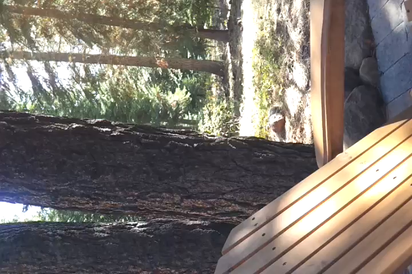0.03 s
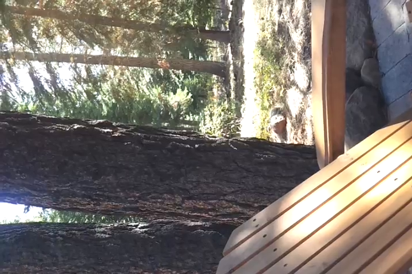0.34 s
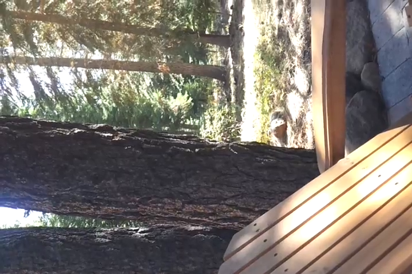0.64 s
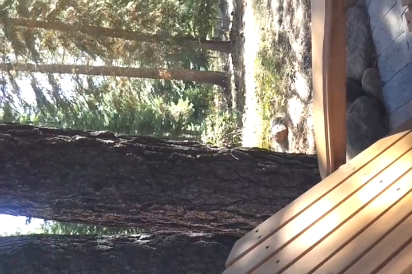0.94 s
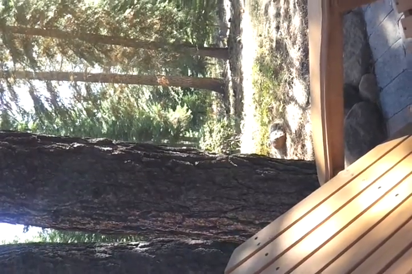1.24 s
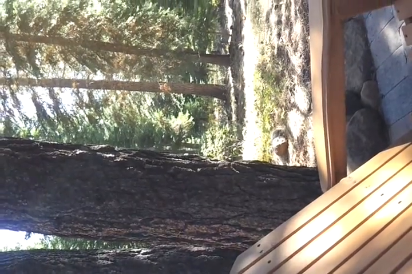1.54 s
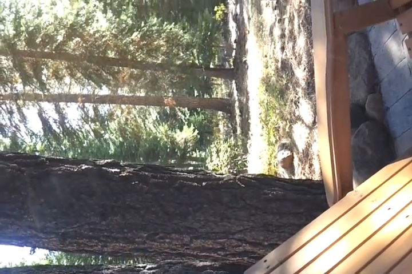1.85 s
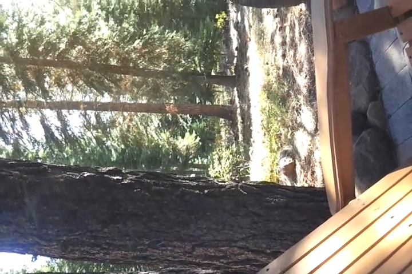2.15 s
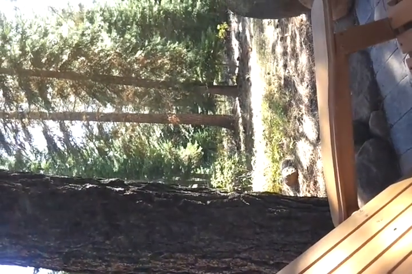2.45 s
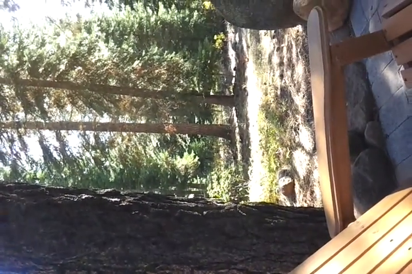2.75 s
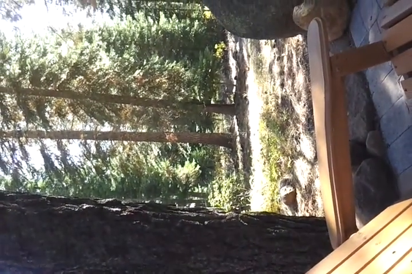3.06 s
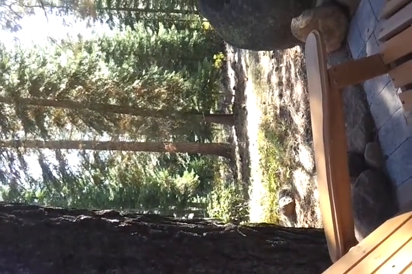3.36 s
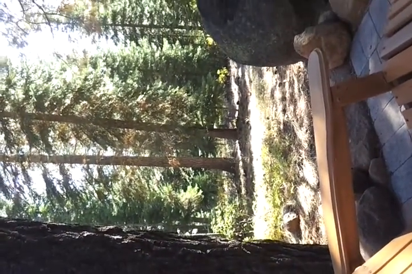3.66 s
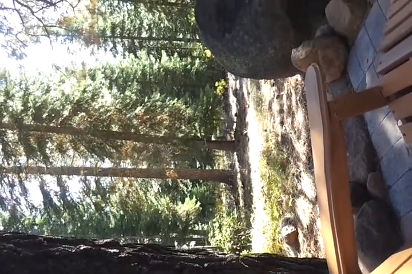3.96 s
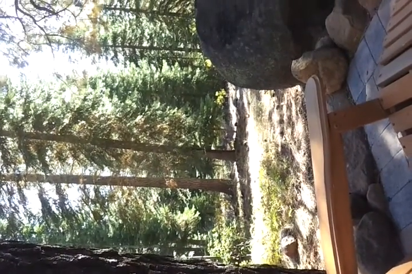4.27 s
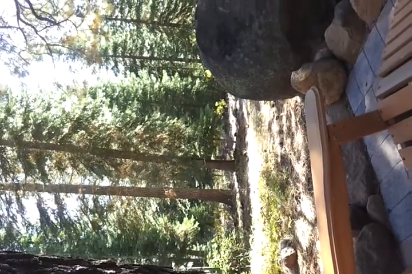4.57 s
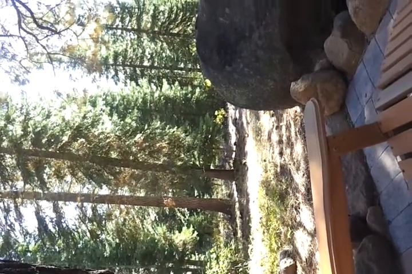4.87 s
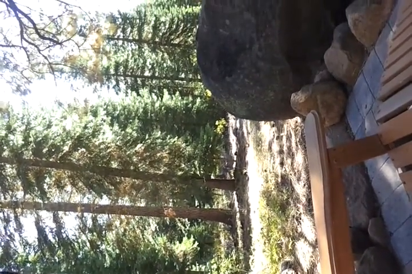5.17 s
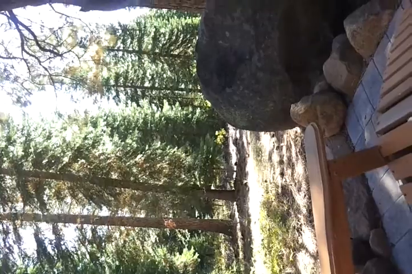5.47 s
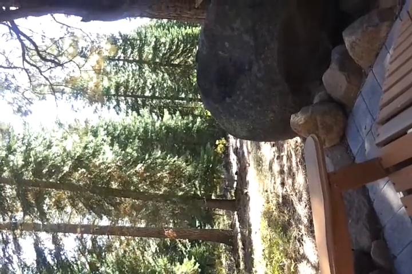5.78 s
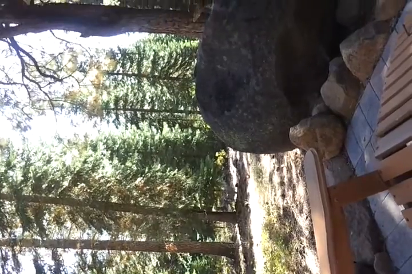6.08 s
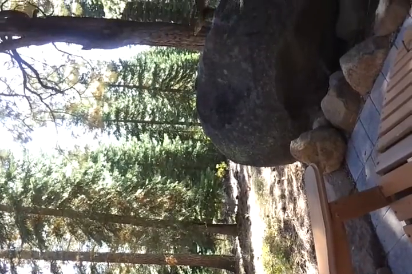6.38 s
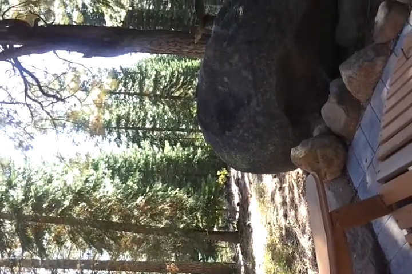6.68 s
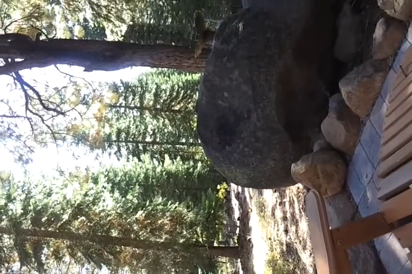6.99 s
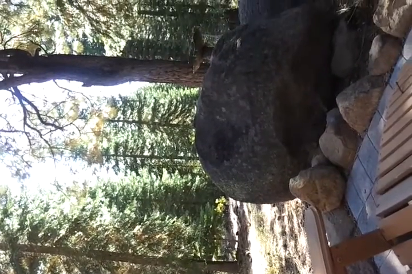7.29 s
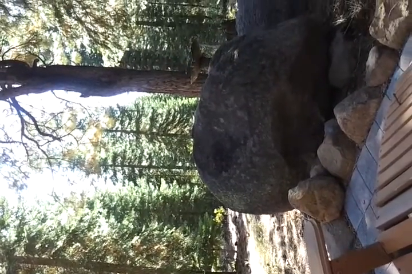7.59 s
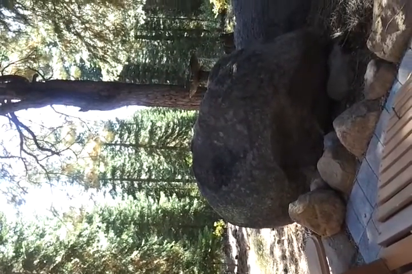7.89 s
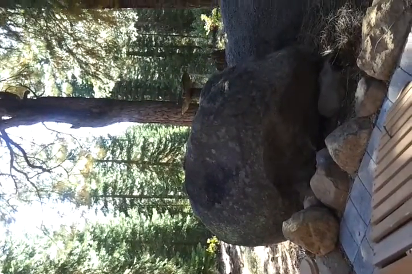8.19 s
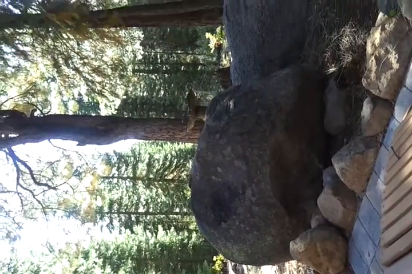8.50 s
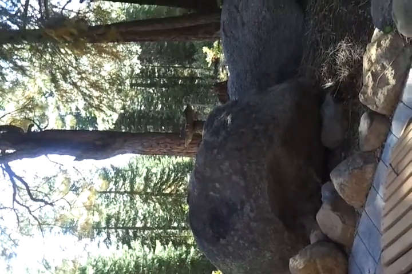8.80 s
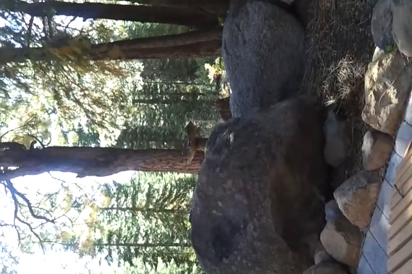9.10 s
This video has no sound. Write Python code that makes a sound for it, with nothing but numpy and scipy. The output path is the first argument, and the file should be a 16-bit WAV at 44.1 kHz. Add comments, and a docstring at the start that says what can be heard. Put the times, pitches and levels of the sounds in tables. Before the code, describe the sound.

A quiet, steady rush of wind in forest trees grows slightly, while light puffs of air bump the microphone.

```python
"""After a short silence, a steady rush of wind in tall conifers fades in and slowly picks up.
The far forest roars; nearer crowns join with a brighter rush and a faint howl, and needles hiss.
Puffs of air reach a cabin deck and rumble on the microphone, where eddies land as soft low thuds.
A few faint high peeps, perhaps far birds, are almost lost in the wind."""
import sys
import numpy as np
from scipy import signal
from scipy.fft import rfft, irfft, next_fast_len
from scipy.io import wavfile
from scipy.ndimage import uniform_filter1d, map_coordinates

SR = 44100
rng = np.random.default_rng(int(sys.argv[2]) if len(sys.argv) > 2 else 0)


def store_pcm(level_fs):
    """Save levels as 16-bit WAV."""
    pcm = np.round(np.clip(level_fs, -1, 1) * 32767).astype(np.int16)
    wavfile.write(sys.argv[1], SR, np.atleast_2d(pcm).T)


N = 403074
TIME_S = np.arange(N) / SR

# Wind in the trees. Each row: time in seconds, rush level in dB.
WIND_LEVELS = [(1.1, -49.5), (2.1, -49.5), (3.3, -49), (5, -48.5), (6.6, -48.5), (7.1, -47.5), (7.9, -46.5),
               (9.1, -46)]
# Tree noise spectra. Each row: frequency in Hz, relative density in dB.
FOREST_SPECTRUM = [(25, -40.5), (80, -19.5), (160, -13), (280, -6), (430, -2), (650, 1), (930, 0),
                   (1200, -4), (1800, -9), (2700, -20), (5000, -37.5), (9000, -55)]
CROWN_SPECTRUM = [(60, -39.5), (250, -12), (520, -7.5), (680, -4.5), (780, -0.5), (930, -.5), (1060, -5.5),
                  (1250, -2.5), (1420, -4), (1620, -5), (1800, -12.5), (2050, -8.8), (2800, -17),
                  (8000, -58)]
NEEDLE_SPECTRUM = [(800, -28), (2000, 0), (2800, 0.5), (3600, 0.5), (5000, -2.5), (6400, -5), (7100, -10.5),
                   (7700, -20.5), (8100, -36), (8800, -41)]
HOWL_SPECTRUM = [(400, -50), (690, -12), (770, -0.5), (850, -2), (925, 1), (1020, -13.5), (1500, -52.5)]
# Pressure spectra at the microphone port. Each row: frequency in Hz, relative density in dB.
DRAUGHT_SPECTRUM = [(15, -38), (30, -13.5), (50, -2), (95, 1), (160, -4), (260, -11), (600, -30),
                    (3000, -81)]
WAKE_SPECTRUM = [(15, -36), (30, -14.5), (50, -1), (85, -1), (180, -3), (280, -2.5), (400, -14.5),
                 (900, -32.5), (3000, -73)]
# Puffs of air on the deck. Each row: start in seconds, length in seconds, rumble level in dB.
AIR_PUFFS = [(1.113, 0.13, -64.5), (1.776, 0.18, -58), (2.24, 0.24, -65), (3.42, 0.39, -61),
             (3.99, 0.47, -62), (4.745, 0.99, -62), (5.997, 0.3, -69), (6.57, 0.54, -61),
             (8.445, 0.17, -60)]
# High peeps. Each row: centre in seconds, pitch in Hz, peak in dB, 1/e half-width in seconds.
FAR_PEEPS = [(1.092, 2370, -56.5, 0.0099), (4.095, 6570, -67.5, .013), (4.122, 6400, -69, .013),
             (8.552, 6220, -64, .018)]
# Eddies on the microphone.
# Each row: crest time in seconds, level in dB, pitch in Hz, width at half height in seconds.
MIC_EDDIES = [(1.18, -58, 115, 0.018), (1.401, -50, 140, 0.013), (1.412, -48, 130, 0.014),
              (1.912, -54, 166, .01), (1.931, -58, 140, .015), (2.272, -43, 119, 0.011),
              (2.286, -47, 119, 0.013), (2.307, -49, 110, 0.017), (2.433, -56, 100, .022),
              (2.47, -56, 151, 0.0079), (3.452, -52, 136, 0.018), (3.559, -54, 118, 0.012),
              (3.58, -52, 132, 0.012), (3.694, -47, 112, 0.013), (3.712, -45.5, 182, 0.0059),
              (3.781, -56, 130, 0.018), (4.055, -50, 128, .01), (4.157, -50, 135, 0.011),
              (4.273, -40, 140, 0.011), (4.289, -46, 165, .011), (4.308, -42, 165, 0.0073),
              (4.409, -51.5, 110, 0.012), (5.154, -53, 139, 0.014), (5.188, -53, 149, .01),
              (5.62, -41, 138, 0.0087), (5.633, -48, 135, 0.012), (5.67, -50, 115, .014),
              (5.689, -40, 125, 0.016), (5.708, -51, 120, 0.016), (5.745, -56, 121, 0.013),
              (6.569, -55, 150, 0.011), (6.646, -51, 107, 0.025), (6.726, -54, 113, 0.012),
              (6.761, -50.5, 112, 0.019), (6.792, -50.5, 106, .022), (6.853, -50, 131, .009),
              (6.87, -50, 136, .01), (6.884, -47, 166, 0.0073), (6.911, -44, 171, .012),
              (6.964, -47, 171, 0.006), (6.985, -47, 132, 0.0076), (7.06, -55, 155, .01),
              (7.26, -50, 145, 0.0075), (7.338, -46, 143, 0.0085), (7.401, -51, 135, 0.007),
              (8.543, -56, 167, .014), (8.572, -44.5, 184, 0.0057), (8.655, -52, 170, 0.013),
              (8.689, -54, 205, .009)]


def amp(db):
    """Decibels to gain."""
    return 10 ** (np.asarray(db) / 20)


def unit_rms(x):
    """x at rms 1."""
    return x / np.sqrt(np.mean(x ** 2) + 1e-20)


def wobble(rate_hz):
    """Smooth random curve through knots at rate_hz."""
    return map_coordinates(rng.standard_normal(256), [TIME_S * rate_hz], mode="mirror")


def filtered(x, response):
    """x filtered by response, a gain as a function of Hz."""
    size = next_fast_len(N + SR // 2)
    return irfft(rfft(x, size) * response(np.fft.rfftfreq(size, 1 / SR)), size)[:N]


def coloured(x, spectrum):
    """x shaped by (Hz, dB) points on a log axis, at rms 1."""
    hz, db = np.transpose(spectrum)
    return unit_rms(filtered(x, lambda f: amp(np.interp(np.log(f + 1), np.log(hz), db))))


def rush(spectrum, patch_db):
    """Turbulent noise at rms 1: branches swell and fade in patches, each at its own pitch."""
    noise_stft = signal.stft(rng.standard_normal(N), nperseg=512)[2]
    patches = uniform_filter1d(rng.standard_normal(noise_stft.shape), size=4, axis=0)  # over frequency
    patches = uniform_filter1d(patches, size=28, axis=1)  # over time
    patchy_noise = signal.istft(noise_stft * amp(patch_db * unit_rms(patches)))[1][:N]
    return coloured(patchy_noise, spectrum)


def trees(lull_db=-49.5, hiss_lull_db=-64.5, hiss_db_per_db=1.92, howl_lull_db=-66.5, howl_db_per_db=3.1):
    """Rising wind moves from the far forest into the nearer crowns; needle hiss and howl grow with it."""
    rush_db = np.interp(TIME_S, *np.transpose(WIND_LEVELS))
    rise_db = rush_db - lull_db
    near_share = np.clip(0.03 + 0.08 * rise_db, 0, 1)
    far_roar = np.sqrt(1 - near_share) * rush(FOREST_SPECTRUM, patch_db=0.44)
    near_roar = np.sqrt(near_share) * rush(CROWN_SPECTRUM, patch_db=0.5)
    sway_db = 0.3 * wobble(rate_hz=5.1)
    roar = amp(rush_db + sway_db) * (far_roar + near_roar)
    hiss = amp(hiss_lull_db + hiss_db_per_db * rise_db + sway_db) * rush(NEEDLE_SPECTRUM, patch_db=0.86)
    howl = amp(howl_lull_db + howl_db_per_db * rise_db + sway_db) * rush(HOWL_SPECTRUM, patch_db=1.5)
    return roar + howl + hiss


def draught(calm_db=-72.5, attack_s=0.024, release_s=0.081, flutter_db=2.5):
    """Air over the microphone port: a faint fluttering rumble that swells and dies with each puff."""
    flow = amp(calm_db)
    for start_s, length_s, level_db in AIR_PUFFS:
        attack = np.clip((TIME_S - start_s) / attack_s, 0, 1)
        release = np.exp(-np.maximum(TIME_S - start_s - length_s, 0) / release_s)
        flow = np.hypot(flow, amp(level_db) * attack * release)  # powers add
    flutter = amp(flutter_db * wobble(rate_hz=31))
    rumble = coloured(rng.standard_normal(N), DRAUGHT_SPECTRUM)
    return flow * unit_rms(flutter * rumble)


def peeps(waver_share=0.0057):
    """Brief soft whistles, slightly wavering in pitch."""
    drift = 1 + waver_share * wobble(rate_hz=27)
    clock_s = np.cumsum(drift) / SR
    out = np.zeros(N)
    for centre_s, pitch_hz, peak_db, half_width_s in FAR_PEEPS:
        bell = np.exp(-((TIME_S - centre_s) / half_width_s) ** 2)
        out += amp(peak_db) * bell * np.sin(2 * np.pi * pitch_hz * clock_s)
    return out


def eddies(octave_share=0.22, wake_db=-8.5, wake_decay_s=0.016):
    """Each eddy thuds with one or two pressure swings, higher the faster it passes, and trails a wake."""
    turbulence = coloured(rng.standard_normal(N), WAKE_SPECTRUM)
    phases_rad = rng.uniform(0, 2 * np.pi, len(MIC_EDDIES))
    out = np.zeros(N)
    for (crest_s, level_db, pitch_hz, width_s), phase_rad in zip(MIC_EDDIES, phases_rad):
        span = abs(TIME_S - crest_s) < 0.1
        t_s = TIME_S[span] - crest_s
        bell = 0.5 ** ((2 * t_s / width_s) ** 2)
        angle_rad = 2 * np.pi * pitch_hz * t_s + phase_rad
        octave = octave_share * bell * np.cos(2 * angle_rad)  # crests sharper than troughs
        swing = np.sqrt(2) * (np.cos(angle_rad) + octave)
        wake = np.where(t_s < 0, bell, np.exp(-t_s / wake_decay_s)) * turbulence[span]
        out[span] += amp(level_db) * (bell * swing + amp(wake_db) * wake)
    return out


def scene():
    """Trees, air on the microphone and far peeps, in mono."""
    return (trees() + draught() + eddies() + peeps())[None]


def record(dry, start_s=0.785, switch_s=0.004, fade_s=0.24, first_gain=0.12, top_hz=8800):
    """Silence until start_s, then a short fade-in; nothing passes above top_hz."""
    switched_on = np.clip((TIME_S - start_s) / switch_s, 0, 1)
    opened = np.clip((TIME_S - start_s) / fade_s, 0, 1)
    fade = switched_on * (first_gain + (1 - first_gain) * opened ** 0.87)
    return filtered(dry[0] * fade, lambda hz: hz < top_hz)[None]


dry = scene()
out = record(dry)
store_pcm(out)
```